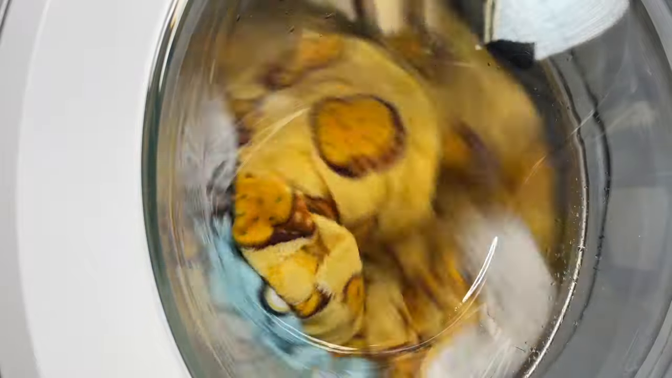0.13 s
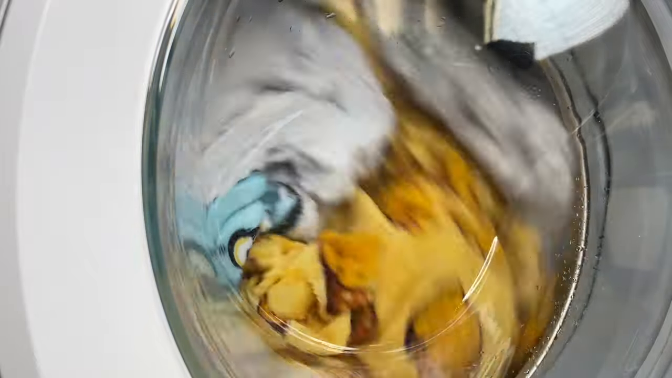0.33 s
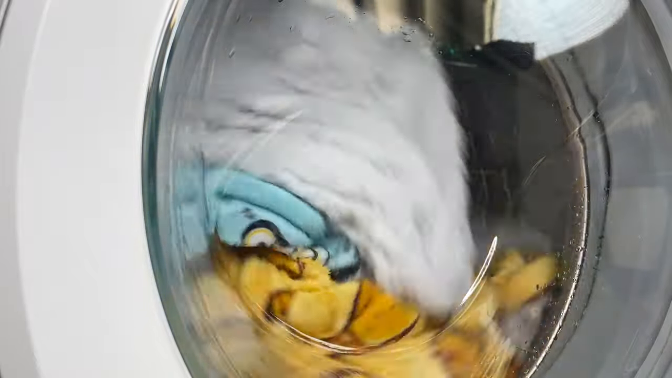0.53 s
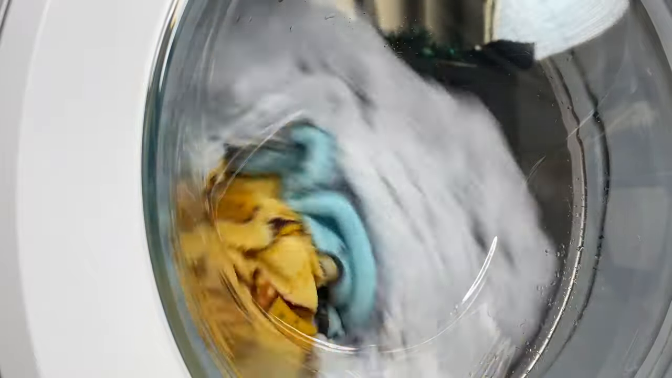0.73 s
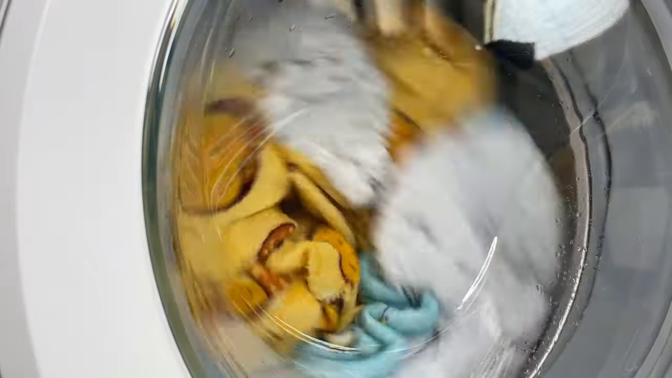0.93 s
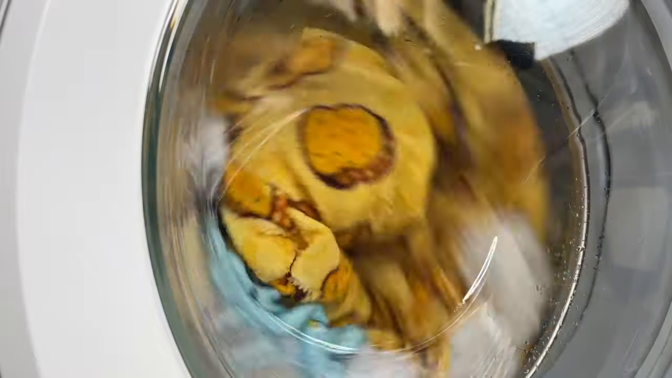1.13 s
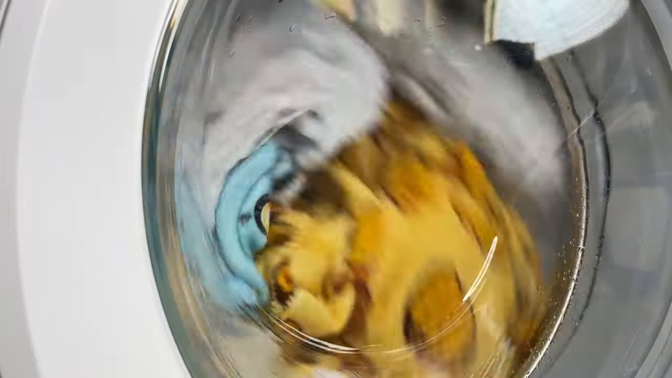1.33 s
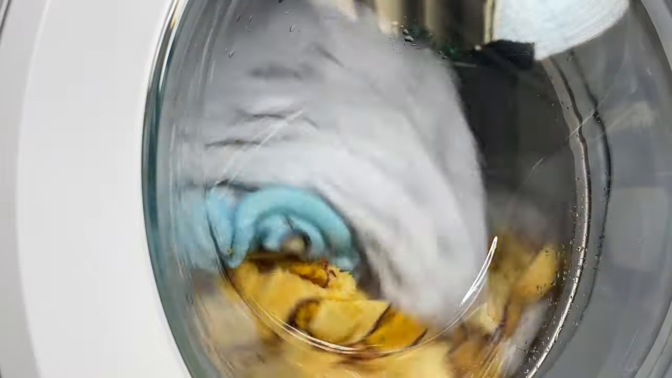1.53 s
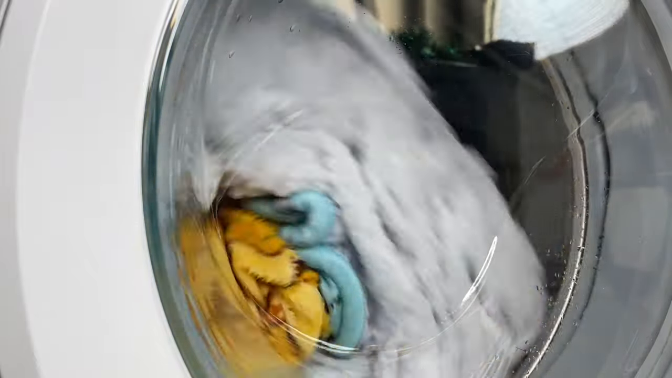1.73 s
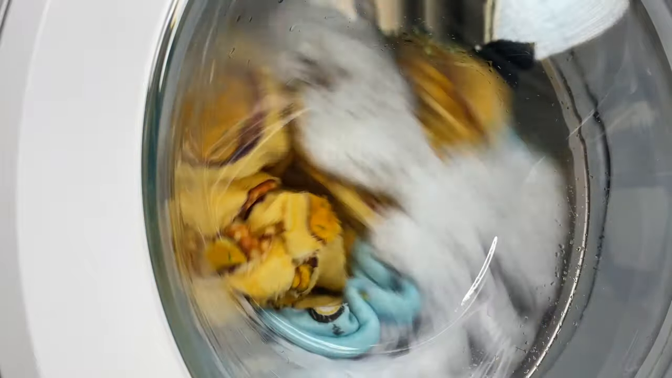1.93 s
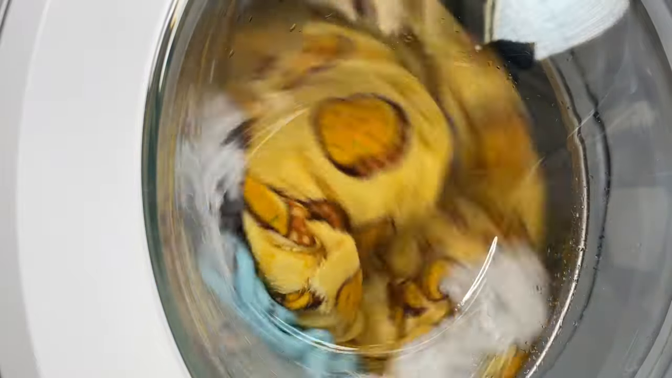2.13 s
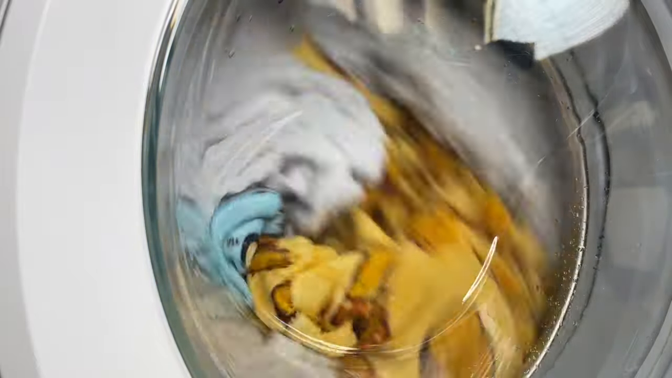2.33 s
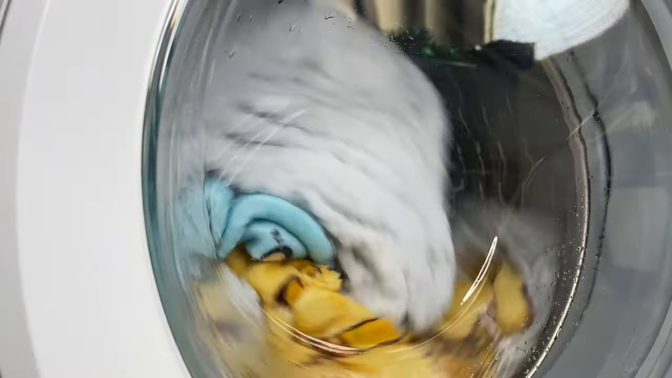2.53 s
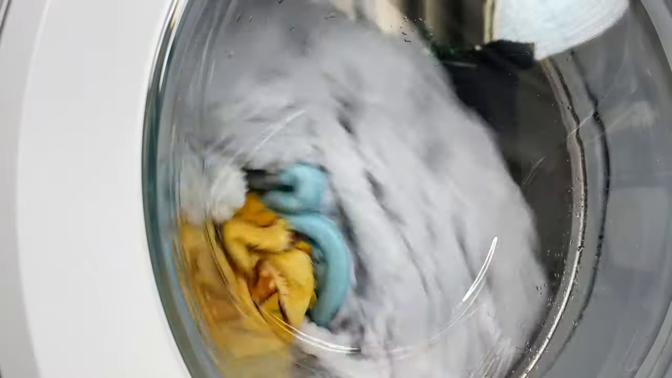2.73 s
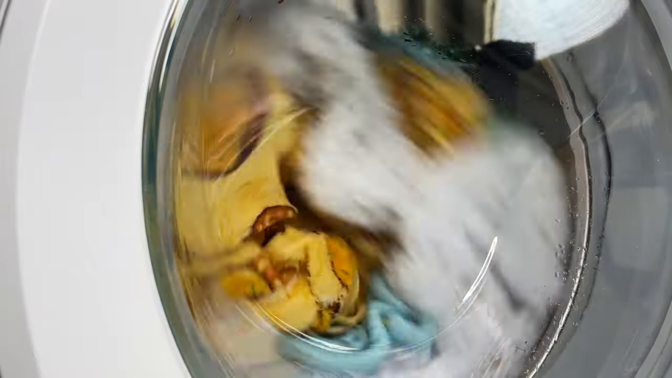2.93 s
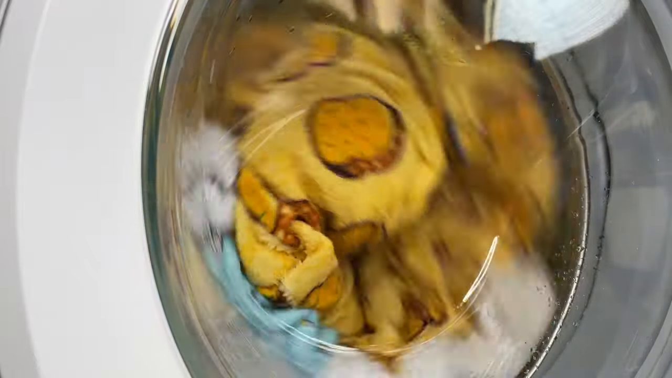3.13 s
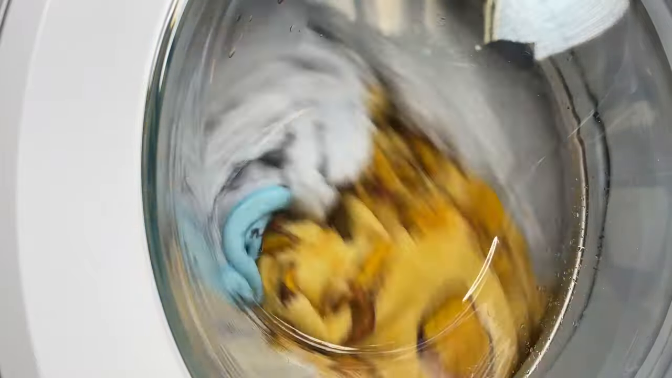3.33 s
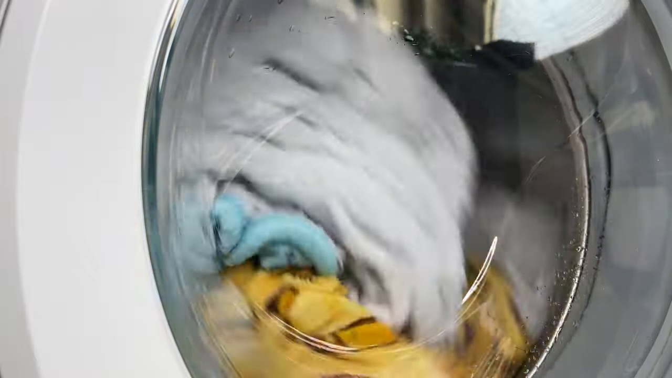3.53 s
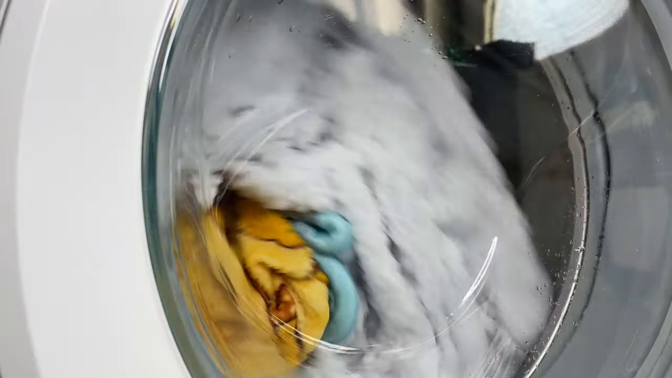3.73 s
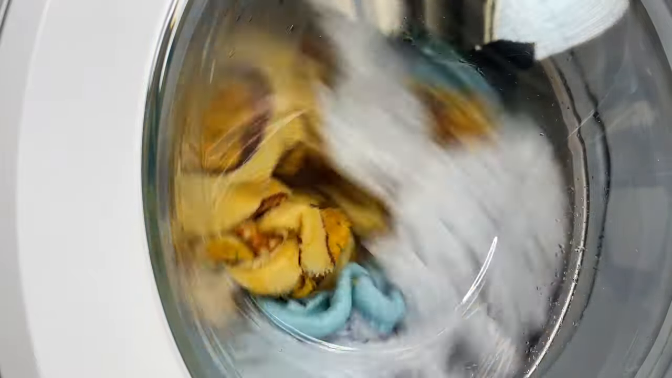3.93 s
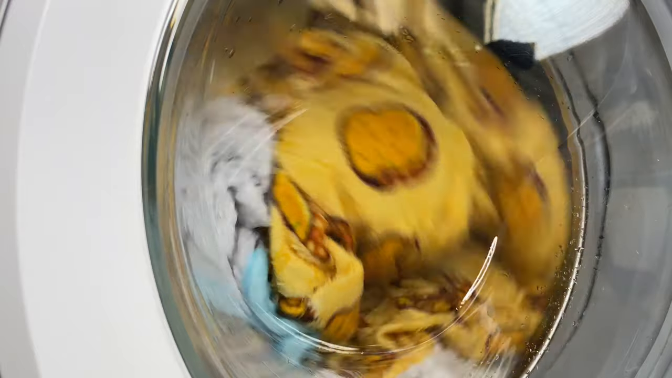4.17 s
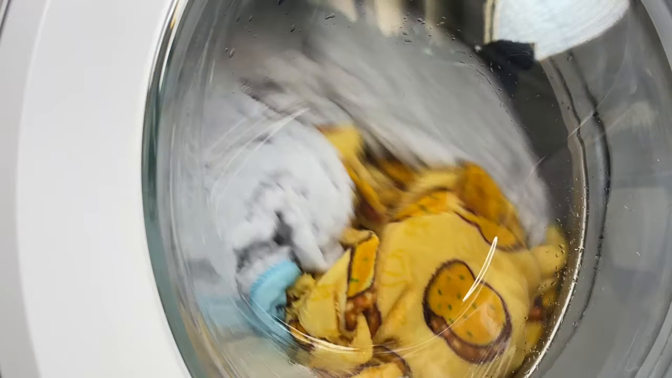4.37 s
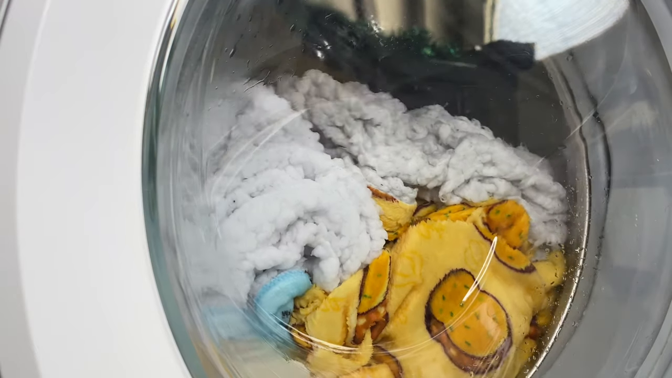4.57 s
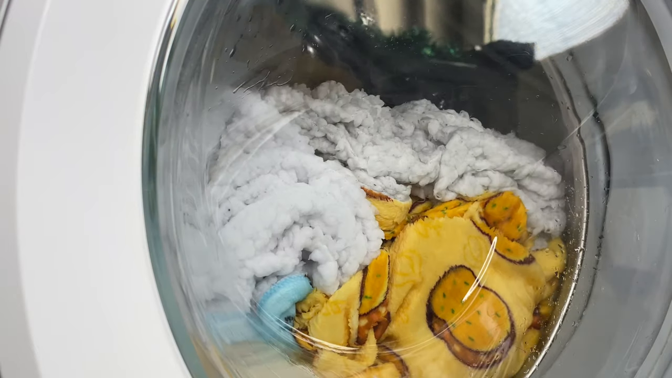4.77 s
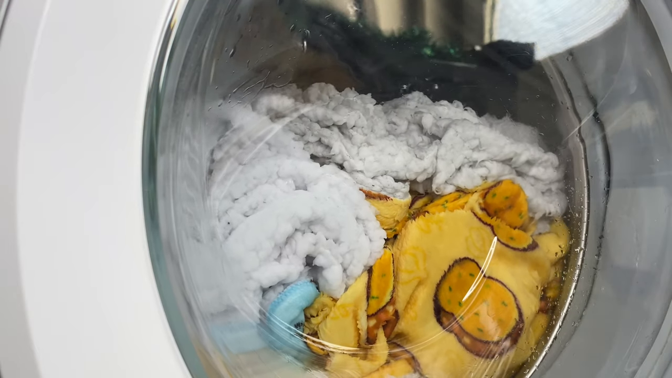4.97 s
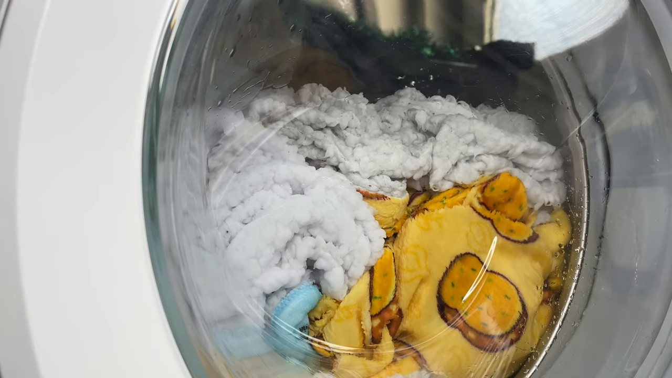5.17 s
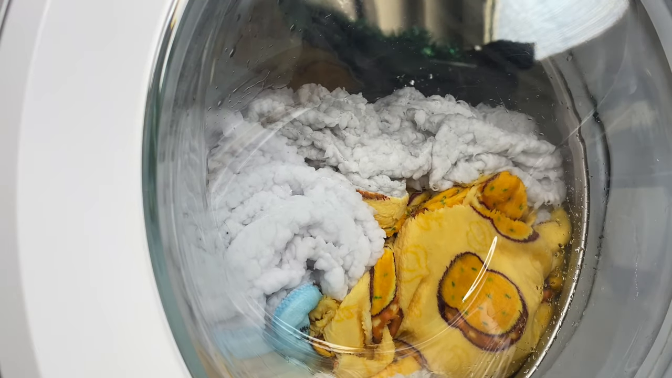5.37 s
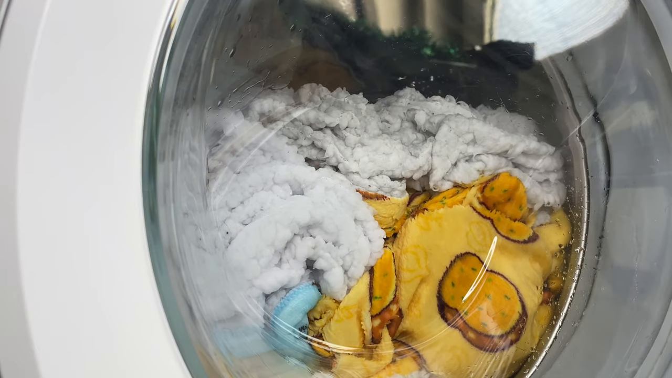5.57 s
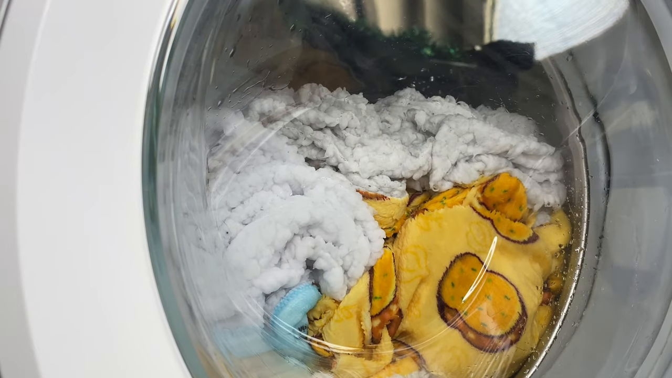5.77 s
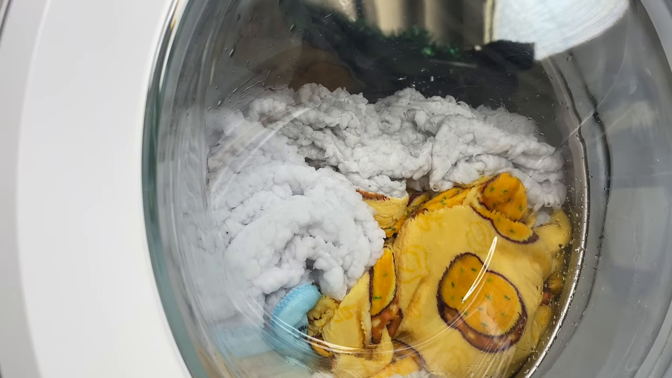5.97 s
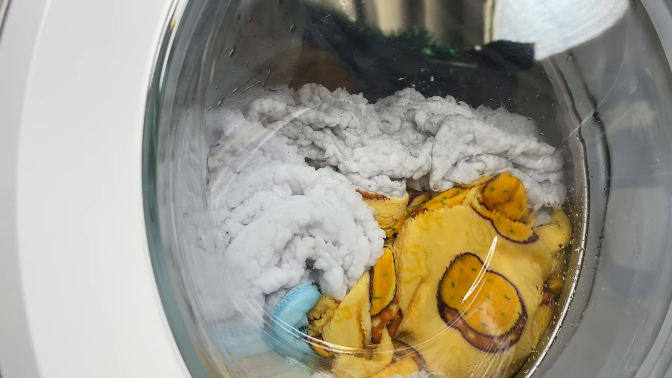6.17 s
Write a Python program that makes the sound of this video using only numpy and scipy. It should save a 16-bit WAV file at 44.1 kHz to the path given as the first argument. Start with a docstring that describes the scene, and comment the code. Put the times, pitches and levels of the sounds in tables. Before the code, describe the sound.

A washing machine tumbles wet clothes with splashes and deep thuds before halting, as water gurgles softly over an electrical hum.

```python
"""Wet laundry thumps and sloshes in a front-loading washer, close to a small two-port microphone.
Paddles drag the load through the water; it slaps the ringing steel drum, throws spray and lands
with a thump that sways the cabinet. Then the drum stops, water glugs off the settling load,
and a mains hum stays over the room's rumble, with a dull low bump at the very end."""
import sys
import numpy as np
from scipy import signal
from scipy.fft import rfft, irfft, next_fast_len
from scipy.io import wavfile
from scipy.ndimage import uniform_filter1d, map_coordinates

SR = 44100
rng = np.random.default_rng(int(sys.argv[2]) if len(sys.argv) > 2 else 0)


def store_wav(level_fs):
    """Save 16-bit WAV to argv[1]."""
    pcm = np.round(np.clip(np.atleast_2d(level_fs), -1, 1) * 32767)
    wavfile.write(sys.argv[1], SR, pcm.T.astype(np.int16))


N = 273420

STOP_S, RUNDOWN_DB_PER_S = 4.45, 190  # the drum halts and the wash dies away
def laundry():
    """The tumbling load: surges and slaps shake the drum and throw spray, landings thump the cabinet."""
    running_db = -RUNDOWN_DB_PER_S * np.maximum(np.arange(N) / SR - STOP_S, 0)
    wash, fine, drumming = surges(running_db)
    smack, thud, splash = slaps_and_trickle()
    lumps, shake = wobble(30.34), patchy(depth_db=1.7)
    body = churn(wash * amp(2.2 * lumps) + smack, shake) + thuds(drumming + thud, shake[::-1])
    water = gurgle(wash) + spray(fine * amp(0.67 * lumps), splash, running_db)
    return body + water + bongs() + rocking(running_db) + plinks(fine) + thumps()

# Paddle strokes: (crest time [s], churn level [dB], spray level [dB], drumming level [dB], hold [s])
PADDLE_STROKES = [(0, -40.5, -52.5, -41.5, 0.097), (0.18, -43.5, -56, -41.5, 0.11),
                  (0.294, -39.5, -58, -46, 0.043), (0.45, -42.5, -54.5, -43, 0.016),
                  (0.501, -41.5, -52.5, -39.5, 0.043), (0.713, -36, -48.5, -33, 0.088),
                  (0.858, -43.5, -54.5, -43.5, 0.047), (0.974, -36.5, -52.5, -34.5, 0.14),
                  (1.184, -38, -57, -36, 0.056), (1.29, -41.5, -51.5, -40, 0.052),
                  (1.334, -39, -63, -36, 0.071), (1.483, -40, -52, -36, 0.093),
                  (1.673, -39, -52, -35.5, 0.12), (1.899, -40, -55, -46, 0.036),
                  (1.967, -38, -52.5, -34.5, 0.14), (2.192, -39.5, -59, -35.5, 0.12),
                  (2.302, -39.5, -53, -38, 0.095), (2.493, -45, -50, -39.5, 0.044),
                  (2.708, -38, -50.5, -38.5, 0.25), (2.968, -41.5, -54, -37, 0.18),
                  (3.153, -36.5, -53, -39, 0.35), (3.34, -39, -52, -34.5, 0.052),
                  (3.5, -40.5, -54, -39.5, 0.1), (3.676, -38.5, -50, -45, 0.052),
                  (3.818, -43, -57, -39, 0.042), (3.977, -39, -53, -34, 0.17),
                  (4.23, -40, -55, -39.5, 0.12), (4.332, -45, -51, -34.5, 0.021)]
RISE_DB_PER_S, SAG_DB_PER_S = (240, 410, 311), (46.5, 34.5, 63)  # each: churn, spray, drumming
FALL_DB_PER_S, LULL_DB = (129, 255, 129), (-49, -71.5, -51)
def surges(running_db):
    """Churn, spray and drumming envelopes: a paddle's drag crests, sags and falls back to a lull."""
    t = np.arange(0, N + 64, 64) / SR
    crest_s, *levels, hold = np.transpose(PADDLE_STROKES)[..., None]
    early, held = np.maximum(crest_s - t, 0), np.clip(t - crest_s, 0, hold)
    late = np.maximum(t - crest_s - hold, 0)
    envelopes = []
    for db, rise, sag, fall, lull in zip(levels, RISE_DB_PER_S, SAG_DB_PER_S, FALL_DB_PER_S, LULL_DB):
        crests = np.linalg.norm(amp(db - rise * early - sag * held - fall * late), axis=0)
        envelopes.append(amp(running_db) * np.hypot(np.interp(np.arange(N) / SR, t, crests), amp(lull)))
    return envelopes

# Cloth hits; the last row is a soft wash of trickling water as the drum stops:
# (time [s], smack level [dB], thud level [dB], splash level [dB], thud t60 [s])
SLAPS_AND_TRICKLE = [(0.154, -66, -28, -73, 0.077), (0.185, -31, -24, -49, 0.16),
                     (0.211, -24, -27, -63, 0.029), (0.242, -37, -22.5, -65, 0.1),
                     (0.69, -25.5, -51, -85, 0.07), (0.721, -37, -34, -62, 0.11),
                     (0.977, -60, -31, -52, 0.1), (0.991, -26.5, -28, -51, 0.14),
                     (1.011, -29, -33, -50, 0.068), (1.077, -35, -45, -63, 0.13),
                     (1.319, -20, -32, -49, 0.1), (1.462, -31.5, -32.5, -56, 0.12),
                     (1.537, -32.5, -48, -61, 0.19), (1.633, -28, -19, -71, 0.056),
                     (1.666, -25.5, -24, -46, 0.076), (1.97, -27, -33, -46, 0.13),
                     (2.055, -43, -37.5, -49, 0.16), (2.165, -38, -50, -65, 0.06),
                     (2.212, -23, -19.5, -46, 0.19), (2.253, -41, -30, -56, 0.1),
                     (2.536, -41.5, -54, -68, 0.64), (2.606, -42, -35, -81, 0.12),
                     (2.689, -31.5, -36, -53.5, 0.46), (2.701, -39, -36, -63, 0.07),
                     (2.802, -34, -27, -61, 0.068), (2.993, -24, -20, -46, 0.23),
                     (3.02, -30.5, -36, -56, 0.3), (3.054, -21, -19, -49, 0.09),
                     (3.071, -25, -26.5, -60, 0.095), (3.187, -40, -36, -65, 0.26),
                     (3.232, -32.5, -32, -65, 0.18), (3.298, -33, -40, -46, 0.094),
                     (3.339, -28, -31, -66, 0.068), (3.467, -32, -32.5, -51.5, 0.17),
                     (3.503, -37, -38, -66, 0.17), (3.542, -30.5, -28.5, -49, 0.11),
                     (3.646, -36, -27, -57, 0.25), (3.778, -41.5, -33, -70, 0.24),
                     (3.909, -53, -20, -61, 0.048), (3.993, -34, -35, -61, 0.12),
                     (4.2, -34, -32.5, -57, 0.21), (4.232, -28.5, -30, -49, 0.17),
                     (4.323, -38, -33, -50, 0.13), (4.335, -26, -26.5, -56, 0.16),
                     (4.426, -36.5, -58, -62, 0.15), (4.53, -53.5, -58, -80, 0.68)]
def slaps_and_trickle():
    """Smack, thud and splash envelopes of wet cloth hitting steel, and of one closing trickle."""
    s, smack_db, thud_db, splash_db, t60 = np.transpose(SLAPS_AND_TRICKLE)
    return (swells(zip(s, smack_db, 0.5 * t60), rise_s=0.0045),
            swells(zip(s, thud_db, t60), rise_s=0.003),
            swells(zip(s, splash_db + 7.5, 0.58 * t60), rise_s=0.0058))

# The load lands: (time [s], level [dB], pitch [Hz], sway level [dB])
LANDINGS = [(0.001, -23, 65, -51), (0.202, -25, 75.6, -40), (0.367, -21, 66, -37), (0.602, -37, 69, -52),
            (0.786, -24, 68, -31.5), (1.036, -13.5, 58, -35), (1.331, -20, 67, -32), (1.481, -23, 63, -48),
            (1.63, -23, 63, -30), (1.82, -33, 66, -40), (1.986, -19.5, 84.5, -37), (2.22, -22, 71, -28),
            (2.49, -50, 67, -48), (2.801, -21, 60.7, -32), (2.997, -10.5, 76, -26.5), (3.183, -24, 76, -46),
            (3.25, -40, 76, -37), (3.385, -15.5, 72, -26.5), (3.652, -20.5, 70, -44), (3.781, -35, 68, -46),
            (4.007, -12, 69.7, -30), (4.245, -21, 65, -27.5), (4.42, -34, 70, -33), (4.458, -25, 65.5, -39),
            (4.627, -30.5, 69, -37)]
def thumps(t60=0.17):
    """The falling load knocks a bass note out of the cabinet."""
    return knocks([(s, db, hz, t60) for s, db, hz, _ in LANDINGS], rise_s=0.0066, waver=0.047, rate=88)

# The cabinet's boom: (frequency [Hz], relative level [dB])
CABINET_EQ = [(25, -61), (45, -11.5), (66, -2), (85, -10), (105, -27.5), (150, -18)]
def rocking(running_db, rock_db=-42, sway_t60=0.46):
    """The cabinet rocks while the drum turns and sways on after each landing."""
    sway = swells([(s, db, sway_t60) for s, *_, db in LANDINGS], rise_s=0.0078)
    return (amp(rock_db + running_db) + sway) * noise(CABINET_EQ)

# Drum resonances: (frequency [Hz], width [Hz], level over the direct sound [dB])
DRUM_MODES = [(164.6, 15.5, 4), (231.3, 7.5, 8), (307, 18.4, -3), (418, 96, -6.5), (455.4, 25, 3.5),
              (594, 40, 4.5), (847, 10.4, 0), (1287, 7.1, 0.5), (1341, 6.3, -4.5)]
def drum(hz):
    """The steel drum lifts its modes out of whatever shakes it."""
    return 1 + sum(amp(db) * 1j * hz * width / (mode ** 2 - hz ** 2 + 1j * hz * width)
                   for mode, width, db in DRUM_MODES)

# Midrange slosh: (frequency [Hz], relative level [dB])
CHURN_EQ = [(250, -22), (450, -27.5), (700, 2.5), (1400, -0.5), (2600, -14), (4000, -28.5), (6000, -44)]
def churn(envelope, shake):
    """Churning water and smacking cloth, heard through the drum."""
    return tinted(envelope * shake, lambda hz: eq(CHURN_EQ)(hz) * drum(hz))

# Dull body of a hit: (frequency [Hz], relative level [dB])
THUD_EQ = [(110, -19), (170, -4), (260, -0.5), (500, -2), (750, -19.5), (1200, -53)]
def thuds(envelope, shake):
    """The load's weight drives the drum's low modes."""
    return tinted(envelope * shake, lambda hz: eq(THUD_EQ)(hz) * drum(hz))

# Drum wall notes: (time [s], level [dB], pitch [Hz], t60 [s])
WALL_NOTES = [(.04, -34.5, 217, 0.19), (.195, -28, 230, 0.33), (.45, -39, 225.8, 0.77),
              (.69, -24, 195, 0.098), (1.36, -34.5, 305.5, 0.4), (1.55, -34, 308, 0.18),
              (1.77, -31, 296, 0.16), (2.05, -29, 233.6, 0.39), (2.225, -22.5, 234, 0.24),
              (2.53, -30.5, 235, 0.18), (2.79, -25, 227.4, 0.2), (3.19, -30, 230, 0.28),
              (3.335, -27.5, 226.6, 0.29), (3.47, -32.5, 231, 0.34), (3.775, -35, 291, 0.36),
              (4.2, -28, 235, 0.33), (4.25, -26, 305, 0.16)]
def bongs():
    """The drum wall rings hollow, as far as the load on it allows."""
    return knocks(WALL_NOTES, rise_s=0.0054, waver=0.041, rate=60)

def gurgle(wash):
    """Bubbles ring under the churn."""
    return wash * amp(-15.5) * bubbles(count=1100, centre_hz=1207, spread=0.536, cycles=20)

# Spray of a surge and splash of a slap: (frequency [Hz], relative level [dB])
SPRAY_EQ = [(1500, 7), (3000, 0.5), (4500, -7.5), (6500, -12), (9000, -11.5), (12000, -14.5), (14000, -27),
            (15500, -31)]
SPLASH_EQ = [(1500, 13.5), (3000, 3.5), (4500, -7.5), (6500, -9), (9000, -8.5), (12000, -10.5),
             (14000, -15), (15500, -23)]
def spray(fine, splash, running_db, seep_db=-64.5):
    """Water hisses off surges and slaps, and seeps through the cloth while the drum turns."""
    hiss = patchy(depth_db=3.25)
    thrown = fine * tinted(hiss, eq(SPRAY_EQ)) + splash * tinted(hiss[::-1], eq(SPLASH_EQ))
    seep = tinted(hiss[[1, 2, 0]], eq([(1500, 7), (2500, -4), (4500, -14), (7000, -27)]))
    return thrown + amp(seep_db + running_db) * seep

# Droplets and squelches: (time [s], level [dB], pitch [Hz], t60 [s])
DOOR_DRIPS = [(.088, -42, 2610, 0.09), (.36, -49, 2060, .07), (.42, -44.5, 3030, 0.12),
              (.44, -45, 2560, 0.087), (1.405, -32, 920, 0.073), (3.503, -34, 800, 0.12),
              (2.608, -34, 822, 0.15), (1.672, -38, 2260, 0.14), (2.164, -40, 2020, .08),
              (2.396, -38, 1010, .07), (2.919, -39, 2960, 0.041), (3.922, -45.5, 3140, 0.15)]
def plinks(fine):
    """Fine bubbles ping under the spray and droplets land near the door."""
    froth = fine * amp(-16) * bubbles(count=500, centre_hz=3115, spread=0.275, cycles=3.5)
    return froth + knocks(DOOR_DRIPS, rise_s=0.0015, waver=0.06, rate=600)

# Draining glugs; the last row is a dull low bump at the very end:
# (time [s], tone level [dB], pitch [Hz], tone t60 [s], shake level [dB])
GLUGS_AND_BUMP = [(4.485, -44, 950, 0.17, -41.5), (4.535, -48, 407, 0.18, -44),
                  (4.599, -48, 598, 0.18, -51.5), (5.235, -49.5, 915, 0.14, -44),
                  (5.27, -53.5, 830, 0.16, -66), (5.32, -49, 334, 0.18, -42.5),
                  (5.38, -36.5, 225.6, 0.2, -48), (5.409, -45, 438, 0.16, -51),
                  (5.44, -62, 1580, 0.17, -81), (5.67, -66, 820, 0.15, -63), (5.81, -61.5, 666, 0.18, -55),
                  (6.091, -38.5, 275, 0.08, -49), (6.181, -47, 258, 0.28, -40)]
# Air let out by a glug: (time [s], level [dB], t60 [s])
AIR_FIZZ = [(5.43, -71, 0.35)]
# Soft last drops: (time [s], level [dB], pitch [Hz], t60 [s])
LAST_DROPS = [(4.43, -50, 875, .1), (4.526, -48, 1600, 0.25), (4.59, -58, 2930, 0.15),
              (4.591, -48.5, 1470, 0.19), (4.594, -55, 2250, 0.094), (4.614, -59, 2800, 0.089)]
def settling():
    """Air pockets waver and shake the drum as water drains off the load; a dull low bump comes last."""
    s, db, pitch, t60, shake_db = np.transpose(GLUGS_AND_BUMP)
    shake = swells(zip(s, shake_db, 1.47 * t60), rise_s=0.01) * rng.standard_normal((3, N))
    dull = tinted(shake, lambda hz: eq(THUD_EQ)(hz) * drum(hz) / (1 + (hz / 520) ** 6))
    fizz = swells(AIR_FIZZ, rise_s=0.025) * noise([(1000, -15), (1600, -10), (5000, 2), (8000, -3)])
    tones = knocks(zip(s, db, pitch, t60), rise_s=0.0026, waver=0.159, rate=400)
    drops = knocks(LAST_DROPS, rise_s=0.0026, waver=0.126, rate=1100)
    return tones + drops + dull + fizz

# The hum's drift: (time [s], pitch [Hz], level [dB])
HUM_DRIFT = [(0, 119.8, -48.5), (4.25, 117.8, -44.5), (4.5, 119.4, -51.5), (5.3, 119.7, -49.5),
             (6.2, 119.3, -50)]
def hum():
    """The coils hum unsteadily at twice the mains frequency, with a rough buzz of the panels."""
    s, *columns = np.transpose(HUM_DRIFT)
    hz, db = [np.interp(np.arange(N) / SR, s, column) for column in columns]
    flutter = amp(1.1 * wobble(5.4))
    phase = 2 * np.pi * np.cumsum(hz + 1.115 * wobble(6)) / SR
    buzz = noise([(95, -11), (112, -14), (120, -16.5), (130, -15.5), (150, -17.5)], shape=N)
    return amp(db) * (np.sqrt(2) * flutter * np.sin(phase) + amp(-10) * buzz)

# Room tone: (frequency [Hz], relative level [dB])
ROOM_EQ = [(20, -24), (45, -5.5), (80, 8.5), (110, -3.5), (150, -5), (230, -9), (350, -15), (450, -25),
           (700, -29.5), (1200, -35), (2000, -39.5), (3200, -46), (5500, -48), (8000, -47), (12000, -57.5),
           (13200, -75)]
def room(level_db=-48.5):
    """The home's low rumble and faint hiss."""
    return amp(level_db + 0.23 * wobble(7.1)) * noise(ROOM_EQ)

def bubbles(count, centre_hz, spread, cycles):
    """Air pockets of scattered sizes ring as damped, rising sines, strewn over three draws."""
    place, chance = rng.random((count, 2)).T[..., None]
    hz = np.clip(centre_hz * np.exp(spread * rng.standard_normal((count, 1))), 400, 6000)
    age = np.arange(900)  # samples
    turns = hz * age / SR
    size = amp(np.minimum(-4 * np.log(chance + 1e-6), 12)) * centre_hz / hz
    envelope = np.exp(-turns / cycles) * (1 - np.exp(-turns)) * np.linspace(1, 0, len(age))
    wave = size * envelope * np.sin(2 * np.pi * turns * (1 + 0.0197 * turns))
    at = (place * 3 * N).astype(int) + age
    return unit(np.bincount(at.ravel(), wave.ravel(), 3 * N)[:3 * N].reshape(3, N))

def knocks(rows, rise_s, waver, rate):
    """Three draws of damped tones whose pitch wavers by a share, rate times a second."""
    out, t = np.zeros((3, N + SR)), np.arange(SR // 4) / SR
    for s, db, hz, t60 in rows:
        envelope = amp(db - 60 * t / t60) * (1 - np.exp(-t / rise_s)) ** 2
        for draw, knots in zip(out, rng.standard_normal((3, 600))):
            bend = 1 + waver * np.interp(t * rate, np.arange(len(knots)), knots)
            draw[round(s * SR):][:len(t)] += envelope * np.sin(2 * np.pi * hz * np.cumsum(bend) / SR)
    return out[:, :N]

def swells(rows, rise_s):
    """Sum of fast-attack envelopes from (time [s], level [dB], t60 [s]) rows."""
    out, t = np.zeros(N + SR), np.arange(SR // 2) / SR
    for s, db, t60 in rows:
        out[round(s * SR):][:len(t)] += amp(db - 60 * t / max(t60, .02)) * (1 - np.exp(-t / rise_s))
    return out[:N]

def patchy(depth_db):
    """Three white noises under one set of random patches in time and frequency."""
    spectra = signal.stft(rng.standard_normal((3, N), np.float32), nperseg=512)[2]
    patches = uniform_filter1d(rng.standard_normal(spectra.shape[1:]), size=5, axis=0)
    patches = unit(uniform_filter1d(patches, size=6, axis=1))
    return unit(signal.istft(spectra * amp(depth_db * patches), nperseg=512)[1][:, :N])

def wobble(rate):
    """A smooth random curve, rate knots a second."""
    return map_coordinates(rng.standard_normal(int(N * rate / SR) + 4), [np.arange(N) * rate / SR])

def noise(points, shape=(3, N)):
    """Noise coloured by an EQ curve."""
    return tinted(rng.standard_normal(shape), eq(points))

def tinted(x, colour):
    """x through a colour scaled so that white noise keeps its rms."""
    return filtered(x, lambda hz: unit(colour(hz)))

def filtered(x, response):
    """x through a complex frequency response."""
    size = next_fast_len(N + SR // 2)
    return irfft(rfft(x, size) * response(np.fft.rfftfreq(size, 1 / SR)), size)[..., :N]

def eq(points):
    """Gain curve through (frequency [Hz], level [dB]) points on a log axis."""
    freqs, db = np.transpose(points)
    return lambda hz: amp(np.interp(np.log(hz + 1), np.log(freqs + 1), db, -120, -120))

def amp(db):
    """Gain of a level in dB."""
    return 10 ** (np.asarray(db) / 20)

def unit(x):
    """x at rms 1."""
    return x / np.sqrt(np.mean(np.abs(x) ** 2) + 1e-20)

# The two ports: (frequency [Hz], likeness [0-1], left phase lead [rad], left over right [dB])
STEREO_IMAGE = [(0, .97, 0, .7), (140, .96, .2, 0), (260, .73, .5, 4), (430, .6, 2.8, 6), (620, .6, 2.9, 4),
                (950, .48, 2.4, 2), (1460, .42, 3, 3), (2580, .42, 6.5, 1), (3100, .35, 7.7, 2),
                (4200, .33, 7.2, 8), (5400, .35, 7.4, 8), (6000, .2, 6.8, 5), (7900, .9, 3.3, 1),
                (8800, .9, 3, 0), (9700, .65, 1.3, 0), (10500, .97, 0, 0), (11600, .98, 0, 0),
                (12300, .6, -2.2, 0), (12700, .99, -3.14, 0), (14100, .99, -3.14, 0), (15200, .9, -6.28, 0)]
def scene():
    """Of three draws, both ports hear the first, shifted in phase, and each a scattered one of its own."""
    draws = laundry() + settling() + hum() + room()
    freqs, likeness, lead, balance_db = np.transpose(STEREO_IMAGE)
    side = np.array([[.5], [-.5]])
    alike = lambda hz: np.interp(hz, freqs, likeness)
    balance = lambda hz: amp(side * np.interp(hz, freqs, balance_db))
    shift = lambda hz: np.exp(1j * side * np.interp(hz, freqs, lead))
    shared = filtered(draws[0], lambda hz: balance(hz) * np.sqrt(alike(hz)) * shift(hz))
    return shared + filtered(draws[1:], lambda hz: balance(hz) * np.sqrt(1 - alike(hz)))

BASS_HZ, TOP_HZ = 45, 15600
def record(dry):
    """Deep bass rolls off and nothing passes above the band limit."""
    return filtered(dry, lambda hz: (hz < TOP_HZ) * (1j * hz / (BASS_HZ + 1j * hz)) ** 2)

dry = scene()
out = record(dry)
store_wav(out)
```